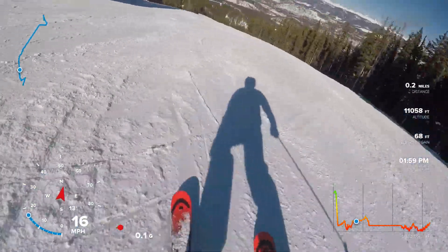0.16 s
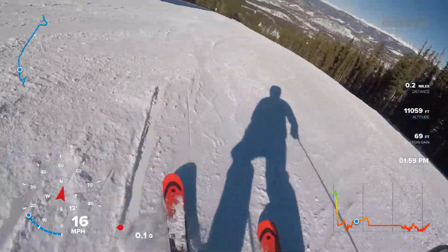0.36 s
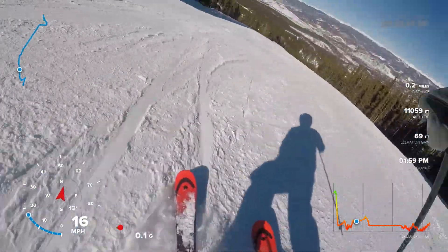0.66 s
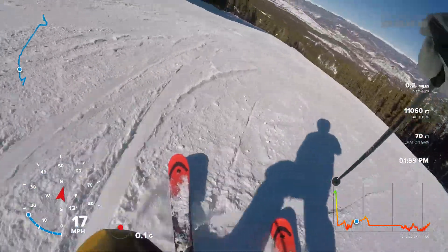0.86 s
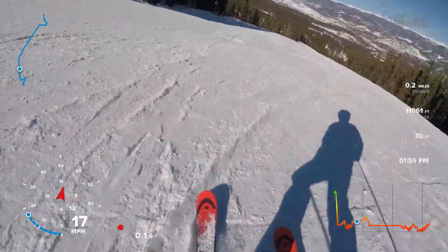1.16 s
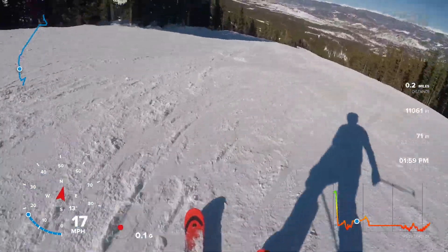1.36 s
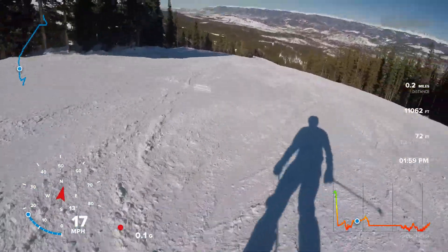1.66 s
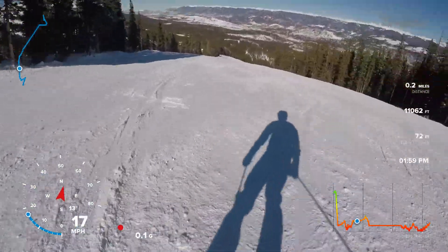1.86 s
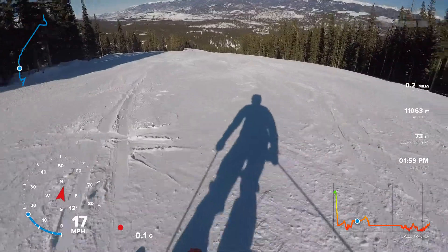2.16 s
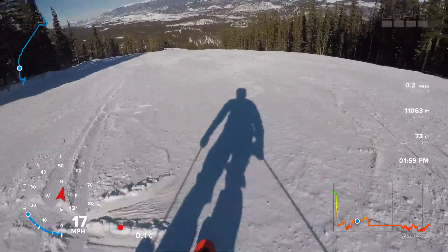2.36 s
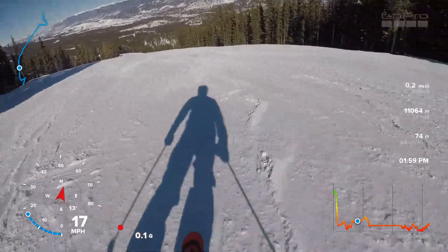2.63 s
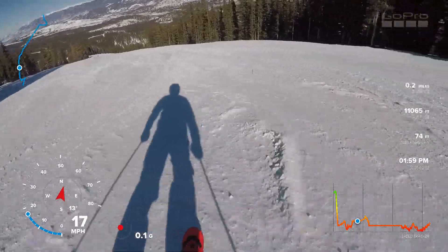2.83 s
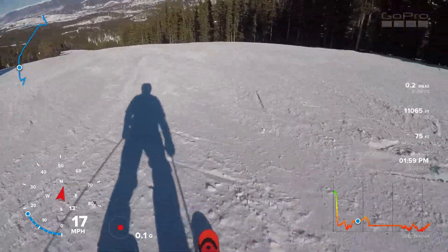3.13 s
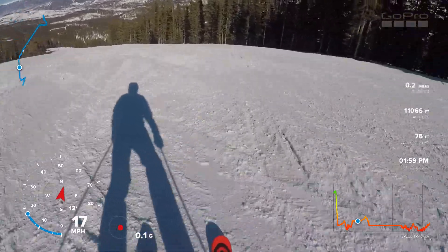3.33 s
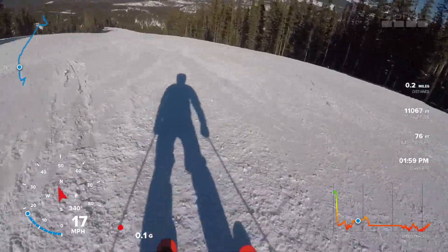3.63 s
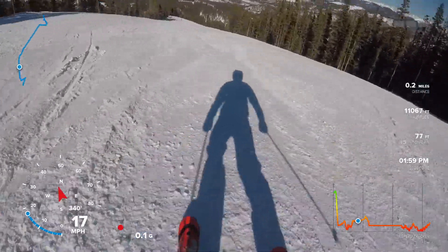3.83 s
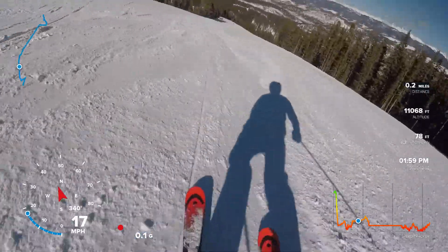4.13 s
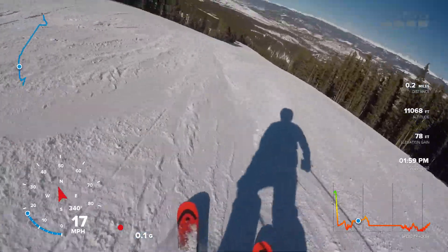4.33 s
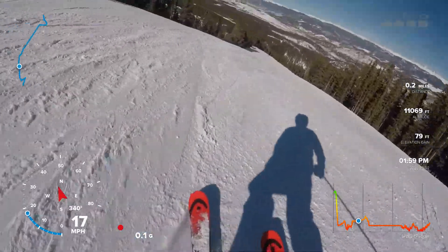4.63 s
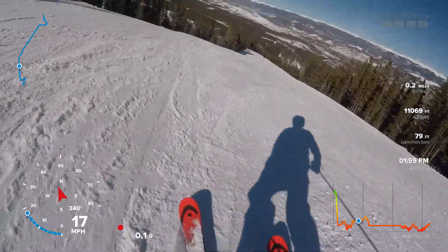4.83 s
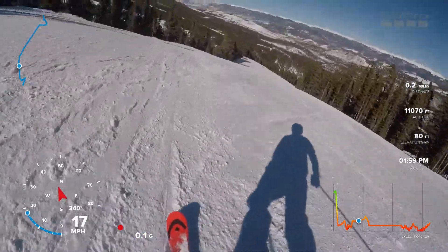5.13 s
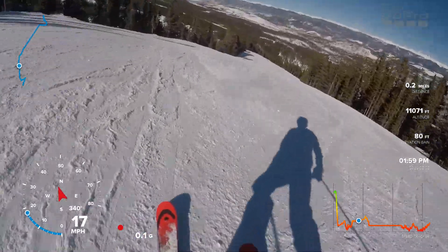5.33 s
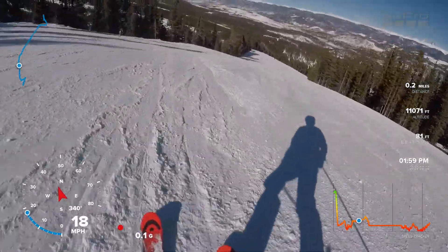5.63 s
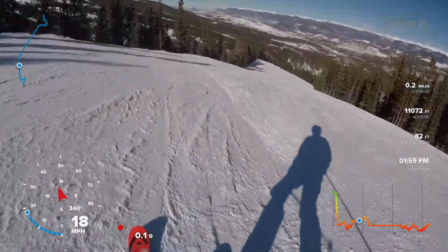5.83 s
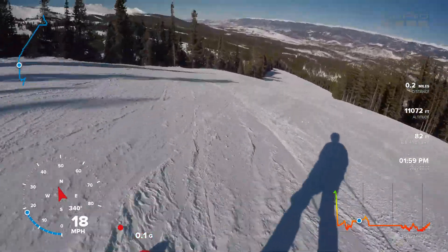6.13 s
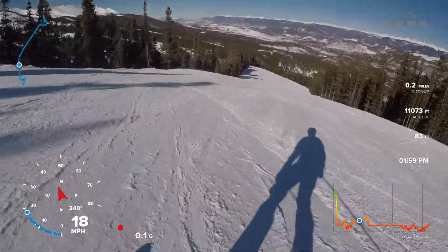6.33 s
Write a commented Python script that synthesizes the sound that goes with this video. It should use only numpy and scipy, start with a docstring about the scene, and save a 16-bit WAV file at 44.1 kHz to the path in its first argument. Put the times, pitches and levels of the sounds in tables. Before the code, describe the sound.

Wind buffets a helmet camera's microphone for the whole six and a half seconds, a low, fluttering rumble with frequent irregular thumps, strongest in the first second and around 4 to 4.5 seconds. Under it, close skis rush grainily over packed snow. From about 0.2 to 0.8 seconds a turn brings hissing spray, a hollow scrape and rasping edges, ending in a brief crunch. The skis glide more quietly until a second bright, chattering turn from 2.2 to 2.9 seconds. The hiss drops again, and hard lumps make short ringing ticks and cracks, clustered between 3.3 and 3.9 seconds. A longer turn swells from 4 seconds, with more ticks around 4.5 to 4.8 and a faint whistle in the spray. It eases unevenly after 5.5 seconds, with a sharp tick near 5.8, while the wind and softer scraping continue to the end.

```python
"""On a packed ski slope, a skier carves downhill, heard by a helmet camera inside its housing.
Wind on the microphone port rumbles, flutters and pops. Snow crystals break under the bases in a
grainy rush, with a hollow scrape and crunching crust. In the turns the edges throw hissing,
faintly whistly spray; they rasp as they catch, and hard lumps set the skis ringing in short ticks."""
import sys
import numpy as np
from scipy import signal
from scipy.fft import rfft, irfft, next_fast_len
from scipy.io import wavfile
from scipy.ndimage import uniform_filter1d

SR = 44100
rng = np.random.default_rng(int(sys.argv[2]) if len(sys.argv) > 2 else 0)


def master(y):
    """Save y as 16-bit WAV."""
    cut = np.clip(np.atleast_2d(y).T, -1, 1)
    pcm = np.round(cut * 32767)  # scale
    wavfile.write(sys.argv[1], SR, pcm.astype(np.int16))


N = 286209

# Tone of the wind's large, middling and small eddies. Each row: frequency in Hz, density in dB.
RUMBLE_SPECTRUM = [(8, 8), (20, 3.5), (36, 2.5), (60, -10), (100, -20), (200, -46.5)]
FLUTTER_SPECTRUM = [(30, -63), (60, -0.5), (120, -5), (170, -9.5), (240, -16), (330, -26.5), (600, -77)]
RUSH_SPECTRUM = [(120, -24), (250, 3), (400, -2), (600, -6.5), (900, -34), (1200, -22.5), (2000, -39)]
# The wind bed on the port. Each row: time in seconds, then rumble, flutter and rush levels in dB.
GUSTS = [(0.0, -24.5, -44.5, -54.5), (0.32, -35, -45.5, -52), (0.63, -29.5, -43, -51.5),
         (0.98, -28, -43.5, -54), (1.32, -41.5, -45, -57), (1.66, -31.5, -43, -54),
         (1.86, -35.5, -43.5, -55), (2.42, -33.5, -44, -55), (2.75, -34.5, -45, -53.5),
         (2.95, -39.5, -44, -59), (3.23, -40.5, -45.5, -55.5), (3.65, -37, -42, -53.5),
         (3.95, -29, -41, -53.5), (4.25, -29.5, -40, -52.5), (4.5, -27, -44.5, -56),
         (4.88, -37.5, -46, -57), (5.51, -39, -45, -57.5), (5.67, -43, -51.5, -57), (5.95, -39, -44, -55.5),
         (6.1, -39, -46, -53.5), (6.17, -39.5, -42, -50.5), (6.27, -39.5, -49.5, -57),
         (6.49, -30, -51, -58)]
# Single buffets riding on the rumble. Each row: time in seconds, level change in dB.
BUFFETS = [(0.029, 1), (.17, 1.5), (.42, 10), (.56, 5.5), (.73, 2.5), (1.0, 2.5), (1.26, 7), (1.37, 7),
           (1.51, 4.5), (1.62, 3.5), (2.04, -2.5), (2.24, 4.5), (2.4, 4), (2.72, 3.5), (3.13, 3.5),
           (3.47, 11), (3.63, 8), (3.84, 8.5), (4.15, 6), (4.29, 11), (4.39, 4.5), (4.59, 9), (4.76, 8),
           (5.02, 4), (5.37, 3.5), (5.67, 10.5), (6.12, 4), (6.46, -3.5)]
# Eddies slapping the port. Each row: start in seconds, thump peak in dB, pitch it sinks to in Hz,
# sharp front in dB against the thump, change in the flutter in dB.
EDDY_POPS = [(.159, -26.5, 130.4, -17, 7), (0.179, -28.5, 121, -23, -2), (.274, -29, 141, -8, 5),
             (0.291, -34, 110, -9, 4.5), (.446, -26, 95, -22, 5), (0.542, -31, 101, -8, 0),
             (.715, -31, 121, -17, -4), (0.772, -26, 133, -11, 6.5), (0.895, -36, 164, -16, 2),
             (1.013, -43, 156, 3, 1), (1.141, -25.5, 129.5, -10, 7), (1.205, -29.5, 123, -16, -1),
             (1.273, -31, 91, -21, 1), (1.435, -27.5, 159, -9, 0), (1.451, -24.5, 85, -27, 6),
             (1.53, -33, 98, -22, 8), (1.69, -38, 168, -16, 2.5), (1.808, -35, 120, -13, 5),
             (2.025, -24.5, 104, -24, 9.5), (2.037, -28.5, 125, -10, 2.5), (2.05, -24.5, 90, -22, -7),
             (2.175, -34, 162, -23, -1.5), (2.399, -33, 153, 5, -2), (2.531, -30, 129, -9, 2.5),
             (2.725, -27, 112, -12, 0.5), (3.102, -33, 107, -5.5, -2), (3.492, -34.5, 164, -9, 0.5),
             (3.544, -32, 163, -14, 2), (3.709, -28.5, 148, -6, -2), (3.817, -30, 128, -4, 12.5),
             (3.836, -32, 104, -26, -5), (3.872, -26.5, 130, -7, -5), (3.971, -33, 101, -7, -3),
             (4.039, -29.5, 127, -14, 0), (4.085, -30.5, 114, -2, 0.5), (4.148, -28.5, 121, -5, -1.5),
             (4.204, -27, 131, -5, -8), (4.279, -39, 128, -21, 1.5), (4.296, -42, 96, -27, 6),
             (4.318, -39, 112, -12, -10), (4.557, -37, 158, 3, -1.5), (4.602, -28, 114, -13, 3),
             (4.736, -39, 114, 5, 16.5), (4.863, -27.5, 131, -17, 6), (5.654, -41.5, 177, 8.5, 10.5),
             (5.759, -36.5, 164.5, -19, 4), (5.79, -36, 170, -6, -2), (5.882, -38, 154, 5, 1.5),
             (6.119, -30, 130, -11, -0.5), (6.162, -37, 170, 2, 3), (6.18, -34, 107, -14, -1),
             (6.298, -42, 170, -2, -3), (6.333, -27.5, 165, -4, 5.5), (6.381, -31, 173, -1.5, 7)]

# Whistly resonances in the spray. Each row: centre in Hz, width in Hz, relative level in dB.
WHISTLE_BANDS = [(5200, 260, -5), (5740, 400, -11)]
# Tone of the snow layers: coarse crust, hollow scrape, gliding bases, edge spray and finest dust.
# Each row: frequency in Hz, density in dB.
CRUNCH_SPECTRUM = [(950, -29), (1200, -4.5), (1400, 1), (1550, -8.5), (2200, -7.5), (2800, -19)]
SCRAPE_SPECTRUM = [(300, -30), (550, -6), (700, -2), (880, -2), (1000, -0.5), (1100, -0.5), (1500, -13)]
GLIDE_SPECTRUM = [(600, -23), (1100, 1), (1500, 3.5), (2100, 0), (2700, -16), (4000, -14.5), (8000, -34.5)]
SPRAY_SPECTRUM = [(900, -43), (1600, 3), (3000, 0.5), (5500, -0.5), (6500, -3.5), (8000, -24), (12000, -73)]
DUST_SPECTRUM = [(4000, 0), (6500, -2), (8500, -2.5), (10500, -6.5), (12000, -26), (15000, -20)]
# Fader rides for the whistle, crunch and scrape. Each row: time in seconds, level in dB.
WHISTLE_LEVELS = [(0, -77), (.4, -63), (.55, -60), (.7, -75), (1.12, -94), (1.18, -66), (1.3, -74),
                  (1.4, -90), (2.3, -78), (3.2, -80), (4.6, -80), (4.8, -63), (5.05, -65), (5.12, -76),
                  (5.2, -69), (5.28, -80), (5.38, -70), (5.52, -73), (5.58, -74), (5.85, -68.5), (6.0, -79),
                  (6.49, -95)]
CRUNCH_LEVELS = [(0, -72), (.2, -76), (.75, -66), (.85, -56.5), (.92, -78), (1.5, -64), (1.7, -72),
                 (2.2, -68), (3.1, -72.5), (3.28, -67), (3.45, -60), (3.49, -68), (3.6, -65), (3.95, -69),
                 (4.3, -62.5), (4.7, -80), (5.2, -75), (6.1, -66.5), (6.3, -71), (6.49, -70)]
SCRAPE_LEVELS = [(.04, -65), (.16, -55), (.32, -57.5), (.42, -61), (.46, -53.5), (.6, -57.5), (.76, -58.5),
                 (.85, -55), (.92, -67), (1.3, -67), (1.57, -59), (1.66, -65), (2.2, -64.5), (2.55, -68),
                 (3.05, -68), (3.42, -61), (3.5, -66), (3.7, -64), (4.0, -60.5), (4.5, -64), (5.15, -69),
                 (5.25, -63), (5.6, -67.5), (6.05, -66), (6.17, -60), (6.24, -64), (6.46, -67)]
# Load on the edges, heard as spray. Each row: time in seconds, level in dB.
EDGE_LOAD = [(0.03, -62), (.17, -55), (.55, -52), (.75, -57.5), (.92, -65.5), (1.1, -65), (1.22, -61.5),
             (1.35, -71.5), (1.55, -66), (1.63, -75.5), (1.98, -73), (2.2, -54), (2.48, -53), (2.5, -66.5),
             (2.62, -58), (2.7, -53), (2.85, -67), (3.02, -74.5), (3.26, -73.5), (3.45, -68.5), (3.47, -75),
             (3.75, -67), (4.03, -57), (4.4, -69), (4.57, -57), (4.87, -58.5), (5.07, -62.5), (5.45, -62),
             (5.7, -70.5), (5.88, -62), (6.17, -71.5), (6.28, -68.5), (6.38, -79), (6.46, -65)]
# Glide on top of what the load gives. Each row: time in seconds, level change in dB.
GLIDE_TRIM = [(0, 0.5), (.5, -1.5), (.7, -4), (1.0, 6.5), (1.3, 2), (1.9, 8.5), (2.3, -5.5), (2.95, 4.5),
              (3.4, 5.5), (3.9, 2), (4.4, 0), (5.0, 1), (5.8, 3), (6.49, 5)]
# The skis go light over a bump, or an edge bites.
# Each row: time in seconds, half width in seconds, level change in dB.
BUMPS = [(.41, 0.0075, 1.5), (.44, 0.012, -2.5), (.54, 0.0074, 2.5), (.83, 0.027, 2), (2.05, 0.012, 6),
         (2.33, 0.018, 4), (2.36, 0.013, -10), (2.93, 0.029, 8), (4.26, 0.025, 4.5), (4.39, 0.05, 10),
         (5.29, 0.028, -5), (5.73, .02, 0), (2.83, 0.018, 8), (4.47, 0.029, -4), (4.72, 0.034, -3.5),
         (5.13, 0.024, -9), (5.2, 0.011, 5), (5.56, 0.017, -6), (5.78, .012, 3), (5.82, 0.024, -2),
         (.2, 0.047, 2.5), (1.55, 0.011, 3.5), (3.43, 0.022, 4.5), (5.96, 0.027, -8), (6.36, 0.028, -11)]

# The ring of a ski and its binding. Each row: pitch in Hz, time to fall 60 dB in seconds.
SKI_MODES = [(830, 0.075), (1415, 0.033), (1599, 0.047), (1938, 0.047), (2440, 0.0092), (3050, 0.017),
             (3950, 0.014), (4880, 0.019), (1320, 0.017), (2130, 0.03)]
# The four modes a scraping edge excites. Each entry: a row index into SKI_MODES.
RASP_MODES = [2, 3, 9, 5]
# Fader ride for the rasp. Each row: time in seconds, then the level of each of those modes in dB.
RASP_LEVELS = [(0, -81, -78, -74, -85), (.17, -63, -56, -57, -76), (.4, -54.5, -63, -69, -72),
               (.56, -59, -67, -76, -71), (.65, -65, -66, -63, -69), (.87, -70, -69, -65, -81),
               (1.0, -67, -72, -78, -73), (1.9, -80, -73, -82, -85), (2.2, -58, -54.5, -76, -70),
               (2.33, -52, -62, -73, -64), (2.37, -65, -61, -72, -71), (2.48, -54, -62, -75, -65),
               (2.52, -66, -63, -79, -70), (2.7, -57, -63, -80, -69), (2.83, -60, -61, -80, -63),
               (2.97, -63, -66, -72, -81), (3.1, -71, -69, -85, -86), (3.3, -74, -71, -77, -85),
               (3.6, -71, -72, -76, -87), (4.0, -69, -77, -70, -76), (4.5, -64, -67, -72, -77),
               (5.5, -64.5, -70.5, -78, -77), (6.49, -72, -68.5, -83, -76)]
# Skis hitting hard lumps; the rows at 2.399 s and 5.657 s, knocking near 850 Hz, give the sharp # front of a
# wind pop instead. Each row: start in seconds, knock centre in Hz, knock drive in dB, # snap centre in Hz, snap
# drive in dB, drive of the crust's crack in dB.
LUMP_HITS = [(0.074, 1600, -44, 3100, -52, -43), (.212, 2000, -42, 1600, -43, -60),
             (0.249, 1590, -44, 3100, -59, -60), (.414, 1610, -41, 2000, -40, -60),
             (0.529, 1910, -37, 1600, -52, -54), (0.542, 1660, -35, 1960, -44, -54),
             (.975, 1960, -45, 3100, -77, -75), (.98, 1600, -42, 3100, -78, -72),
             (1.02, 1490, -41, 3420, -47, -44), (1.148, 1600, -49, 1960, -59, -65),
             (1.434, 850, -55, 1420, -56, -60), (1.788, 1570, -46, 3100, -71, -66),
             (1.902, 1950, -46.5, 3100, -72, -68), (2.049, 1600, -49, 1960, -50, -60),
             (2.399, 850, -45, 2440, -42, -38), (3.006, 1650, -43, 3100, -62, -58),
             (3.08, 1910, -49, 3100, -73, -70), (3.179, 1890, -49, 3100, -60, -52),
             (3.282, 1500, -69, 4400, -54, -56), (3.304, 1410, -44, 4800, -52, -52),
             (3.425, 1940, -55, 1420, -52, -57), (3.498, 1500, -76, 4700, -59, -58),
             (3.538, 2160, -52, 3800, -47, -44.5), (3.544, 1320, -40, 2450, -56, -52),
             (3.579, 2210, -43, 3800, -50, -43.5), (3.71, 860, -53, 1290, -56, -60),
             (3.815, 2450, -42, 3900, -41, -40), (3.826, 2300, -38, 4500, -61, -57),
             (3.856, 2390, -30.5, 4900, -42, -49), (4.431, 1600, -47, 4300, -47, -48),
             (4.512, 1690, -45, 2450, -43, -44), (4.554, 1600, -43, 850, -50, -60),
             (4.581, 1610, -43, 2450, -39, -56), (4.737, 1430, -37.5, 850, -53, -50),
             (4.776, 2450, -39, 3100, -60, -58), (4.836, 1530, -43, 1960, -51, -62),
             (5.657, 850, -49, 2450, -65, -61), (5.772, 1790, -33, 3100, -46, -58),
             (5.886, 1960, -56, 1420, -50, -59), (6.192, 834, -60, 1600, -54, -64),
             (6.335, 1320, -42, 1960, -49, -52), (6.425, 1960, -48, 1600, -65, -64)]

# Peaks and dips of the camera housing. Each row: centre in Hz, width in Hz, gain in dB.
HOUSING_EQ = [(862, 215, 6.5), (1142, 404, -17), (1595, 140, 6.5), (1665, 85, -8), (1945, 130, 0.5),
              (2670, 100, 6.5), (2833, 176, -12.5), (3133, 130, 5.5), (3860, 280, -1.5), (4040, 180, 2.5),
              (4520, 390, -1.5), (5100, 63, -3), (6980, 1140, -12), (8200, 390, 4.5)]
# Tone of the preamplifier's hiss. Each row: frequency in Hz, density in dB.
HISS_SPECTRUM = [(1500, 4), (3000, -0.5), (6000, -4), (9500, -4.5), (12000, -10), (15500, -20)]


def from_db(db):
    """Gain for a level in dB."""
    return 10 ** (np.asarray(db) / 20)


def unit_rms(x):
    """The signal scaled to an rms of 1."""
    return x / np.sqrt(np.mean(x ** 2) + 1e-20)


def envelopes(rows):
    """One sample-by-sample curve for each column after the time."""
    times, *columns = np.transpose(rows)
    return [np.interp(np.arange(N) / SR, times, column) for column in columns]


def swells(centres_s, half_width_s, db):
    """A sum of bell-shaped level changes, in dB."""
    t = np.arange(0, N + 64, 64) / SR
    bells = db * np.exp(-.5 * ((t[:, None] - centres_s) / half_width_s) ** 2)
    return np.interp(np.arange(N) / SR, t, bells.sum(axis=1))


def drift(corner_hz):
    """A random wobble with a spread of 1: noise through two one-pole low-passes."""
    hop, settle = 40, 2000
    pole = np.exp(-2 * np.pi * corner_hz * hop / SR)
    noise = rng.standard_normal(N // hop + settle + 2)
    slow = signal.lfilter([1], [1, -2 * pole, pole * pole], noise)[settle:]
    return np.interp(np.arange(N) / hop, np.arange(len(slow)), unit_rms(slow))


def grains(per_s, spread_db):
    """Random clicks of uneven size and sign, at an rms of 1."""
    sizes = from_db(spread_db * np.minimum(rng.exponential(1, N), 4)) * rng.choice([-1, 1], N)
    return unit_rms(sizes * (rng.random(N) < per_s / SR))


def coloured(x, spectrum):
    """White noise or clicks shaped to a spectrum, at an rms of 1."""
    size = next_fast_len(N)
    hz = np.maximum(np.arange(size // 2 + 1) * SR / size, 1)
    points_hz, points_db = np.transpose(spectrum)
    shape_db = np.interp(np.log(hz), np.log(points_hz), points_db, left=-90, right=-90)
    return unit_rms(irfft(rfft(x, size) * from_db(shape_db), size)[:N])


def evened(x, window_s):
    """Noise with its own slow swells ironed out, ready for a fader ride."""
    power = uniform_filter1d(x ** 2, round(window_s * SR))
    return unit_rms(x / np.sqrt(power + 0.029))


def patchy(x, spread_db):
    """Every half octave from 500 Hz up swells and sinks a little on its own."""
    size = next_fast_len(N)
    octave = np.log2(np.maximum(np.arange(size // 2 + 1) * SR / size, 1) / 500)
    spectrum, out = rfft(x, size), 0
    for k in range(10):
        band = np.clip(1 - np.abs(2 * octave - k), 0, 1)   # overlapping triangles
        wobble_db = spread_db * (0.3 * drift(2.0) + drift(24.5))
        out += irfft(spectrum * band, size)[:N] * from_db(wobble_db)
    return out


def resonate(x, hz, radius):
    """One resonance; the nearer the pole radius is to 1, the longer it rings."""
    return signal.lfilter([1, 0, -1], [1, -2 * radius * np.cos(2 * np.pi * hz / SR), radius ** 2], x)


def ping(t, hz, t60, phase=0):
    """A dying sine whose attack takes half a cycle, or 1.8 ms if that is longer."""
    attack = np.minimum(t / max(.5 / hz, .0018), 1)
    return np.sin(2 * np.pi * hz * t + phase) * attack * from_db(-60 * t / t60)


def add(out, start_s, sound):
    """Drops a one-shot into the track."""
    at = round(start_s * SR)
    out[at:at + len(sound)] += sound[:N - at]


def wind():
    """Turbulence at three eddy sizes; the two smaller come in lumps that they partly share."""
    rumble_db, flutter_db, rush_db = envelopes(GUSTS)
    buffet_s, lift_db = np.transpose(BUFFETS)
    buffet_db = swells(buffet_s, half_width_s=0.03, db=lift_db)
    pop_s, *_, pop_stir_db = np.transpose(EDDY_POPS)
    stir_db = swells(pop_s + 0.017, half_width_s=0.017, db=pop_stir_db)   # the wake of each pop
    lumps = drift(42)
    rumble = evened(coloured(rng.standard_normal(N), RUMBLE_SPECTRUM), window_s=0.121)
    rumble *= from_db(rumble_db + buffet_db)
    flutter = evened(coloured(grains(400, spread_db=2.5), FLUTTER_SPECTRUM), window_s=0.087)
    flutter *= from_db(flutter_db + stir_db + 2.3 * lumps)
    rush = coloured(grains(900, spread_db=1.0), RUSH_SPECTRUM)
    rush *= from_db(rush_db + 0.5 * stir_db + 1.03 * lumps + 0.64 * drift(30))
    return rumble + flutter + rush


def wind_pops():
    """An eddy slaps the port: a cycle or two of thump that dives in pitch, with a sharper front."""
    overshoot, sink_s, swell_cycles = 4.45, 0.0015, 0.71   # overshoot in multiples of the final pitch
    out, t = np.zeros(N), np.arange(round(.06 * SR)) / SR
    for start_s, peak_db, hz, front_db, _ in EDDY_POPS:
        thump_phase, front_phase, detune = rng.standard_normal(3) * [0.53, 1.54, 1]
        cycles = hz * (t + overshoot * sink_s * (1 - np.exp(-t / sink_s)))
        age = t * hz / swell_cycles
        thump = np.sin(2 * np.pi * cycles + thump_phase) * (age * np.exp(1 - age)) ** 4.7
        front_hz = 580 * (1 + .17 * np.clip(detune, -2, 2))
        front = from_db(front_db) * ping(t, front_hz, t60=6.6 / front_hz, phase=front_phase)
        add(out, start_s + 0.0009, from_db(peak_db) * (front - thump))
    return out


def spray_whistle():
    """A faint, flickering whistle in the spray: noise twice through each narrow resonance."""
    out = 0
    for hz, width_hz, db in WHISTLE_BANDS:
        radius = np.exp(-np.pi * width_hz / SR)
        band = resonate(resonate(rng.standard_normal(N), hz, radius), hz, radius)
        out += unit_rms(band) * from_db(db + 3.9 * drift(14))
    return out * from_db(envelopes(WHISTLE_LEVELS)[0])


def crust_crunch():
    """Coarse crust crunches under the bases: sparse, uneven grains in clumps."""
    crunch = coloured(grains(500, spread_db=3.0), CRUNCH_SPECTRUM)
    return crunch * from_db(envelopes(CRUNCH_LEVELS)[0] + 1.7 * drift(43))


def edge_rasp():
    """Sparse catches of the edge ring in the ski, each mode struck by grains of its own."""
    ring_share = .5   # of the free ringing time, with the edge sunk in snow
    out = 0
    for row, level_db in zip(RASP_MODES, envelopes(RASP_LEVELS)):
        hz, t60 = SKI_MODES[row]
        radius = from_db(-60 / (ring_share * t60 * SR))
        out += from_db(level_db) * unit_rms(resonate(grains(450, spread_db=3.5), hz, radius))
    return out


def lump_ticks():
    """A blow drives the ski's modes nearest its two centres hardest; breaking crust adds a crack."""
    flex, crack_t60 = 0.046, 0.044   # flex: largest share by which the ski's bend shifts its pitches
    out, t = np.zeros(N), np.arange(round(.09 * SR)) / SR
    modes_hz = np.array(SKI_MODES)[:, 0]
    fade = from_db(-60 * t / crack_t60)
    for start_s, knock_hz, knock_db, snap_hz, snap_db, crack_db in LUMP_HITS:
        noise = rng.standard_normal(len(t))
        bend = 1 + flex * np.tanh(noise[-1])
        rings = np.array([ping(t, hz * bend, t60) for hz, t60 in SKI_MODES])
        knock = from_db(knock_db - 69 * np.abs(np.log2(modes_hz / knock_hz)))
        snap = from_db(snap_db - 54 * np.abs(np.log2(modes_hz / snap_hz)))
        roughness = 1 + 1.12 * uniform_filter1d(uniform_filter1d(noise, size=30), size=30)
        crust_band = signal.butter(4, [0.3 * snap_hz, 1.21 * snap_hz], "band", fs=SR, output="sos")
        crack = from_db(crack_db) * signal.sosfilt(crust_band, noise * fade)
        add(out, start_s, roughness * ((knock + snap) @ rings) + crack)
    return out


def carving_skis():
    """Crystals break under the bases; loaded edges add brighter spray, all chattering partly in step."""
    glide_base_db, dust_base_db, steady_above_db = -62, -71.5, -54
    load_db, = envelopes(EDGE_LOAD)
    scrape_db, = envelopes(SCRAPE_LEVELS)
    trim_db, = envelopes(GLIDE_TRIM)
    spray_db = load_db + swells(*np.transpose(BUMPS))
    swing_db = spray_db - load_db.mean()
    hanging_db = uniform_filter1d(swing_db, round(0.083 * SR))   # dust hangs, smoothing the swings
    # A heavily loaded edge slides more evenly and loses some of its chatter.
    looseness = 1 - 0.32 * np.clip((load_db - steady_above_db) / 5, 0, 1)
    chatter = looseness * (drift(51) + 0.28 * drift(9))
    glide = coloured(grains(2000, spread_db=1.0), GLIDE_SPECTRUM)
    glide *= from_db(glide_base_db + trim_db + swing_db + 1.47 * chatter + looseness * drift(40))
    spray = coloured(grains(9000, spread_db=2.5), SPRAY_SPECTRUM)
    spray *= from_db(spray_db + 0.97 * chatter + 0.59 * drift(57))
    dust = coloured(grains(14000, spread_db=2.0), DUST_SPECTRUM)
    dust *= from_db(dust_base_db + 0.73 * hanging_db + chatter)
    scrape = coloured(grains(1500, spread_db=4.0), SCRAPE_SPECTRUM)
    scrape *= from_db(scrape_db + 1.1 * chatter)
    return patchy(glide + spray + dust + scrape, spread_db=1.5)


def housing(x):
    """Airborne sound reaches the capsule through cavities and slots: a chain of peaks and dips."""
    for hz, width_hz, db in HOUSING_EQ:
        tuning = -2 * np.cos(2 * np.pi * hz / SR)
        width, gain = np.pi * width_hz / SR, from_db(db / 2)
        zeros = [1 + width * gain, tuning, 1 - width * gain]
        poles = [1 + width / gain, tuning, 1 - width / gain]
        x = signal.lfilter(zeros, poles, x)
    return x


def scene():
    """The mono mix: the housing colours the rush of the skis; all else reaches the port directly."""
    mix = housing(carving_skis()) + lump_ticks() + wind() + wind_pops()
    mix += edge_rasp() + spray_whistle() + crust_crunch()
    return mix[None, :]


def record(dry):
    """The preamplifier adds a bed of hiss, and a steep low-pass takes off the very top."""
    hiss_db, cutoff_hz = -69, 15150
    hiss = from_db(hiss_db) * coloured(rng.standard_normal(N), HISS_SPECTRUM)
    low_pass = signal.ellip(12, .5, 60, cutoff_hz, fs=SR, output="sos")
    return signal.sosfilt(low_pass, dry + hiss)


dry = scene()
out = record(dry)
master(out)
```